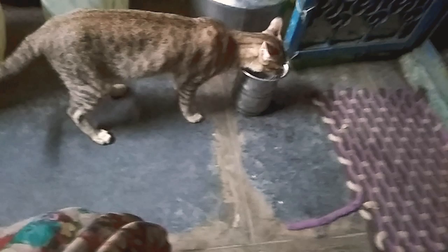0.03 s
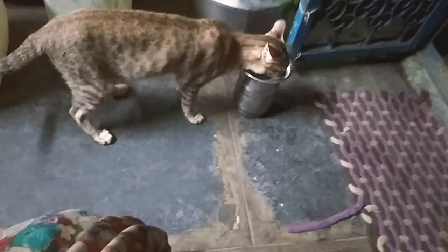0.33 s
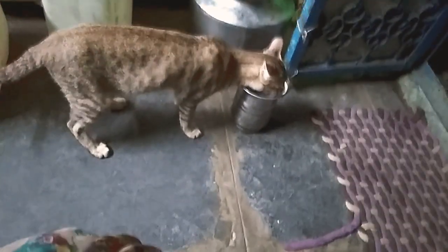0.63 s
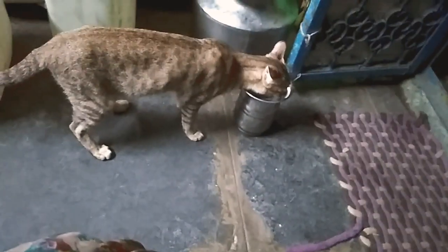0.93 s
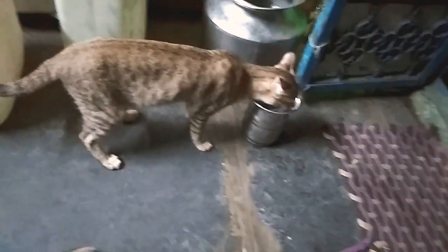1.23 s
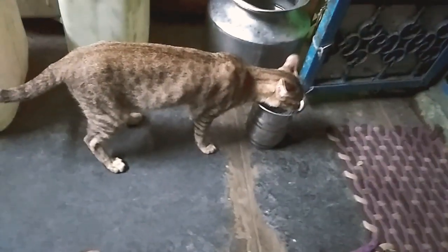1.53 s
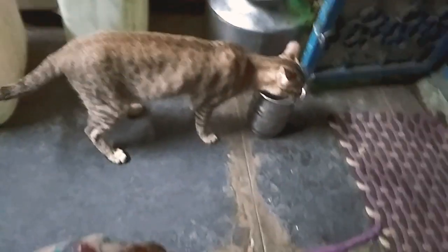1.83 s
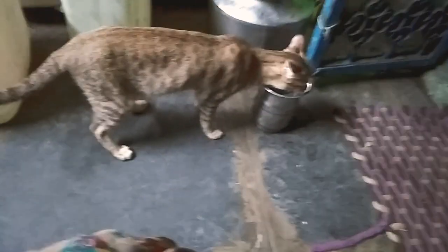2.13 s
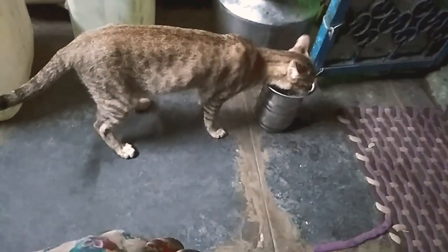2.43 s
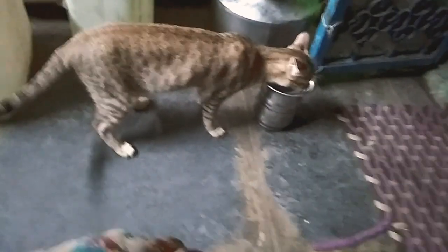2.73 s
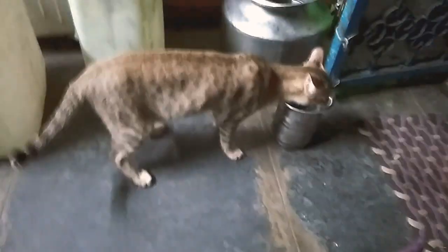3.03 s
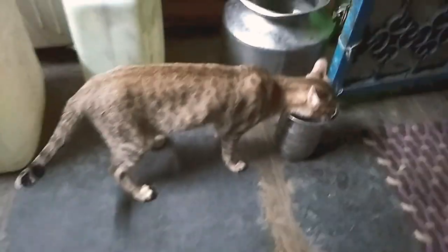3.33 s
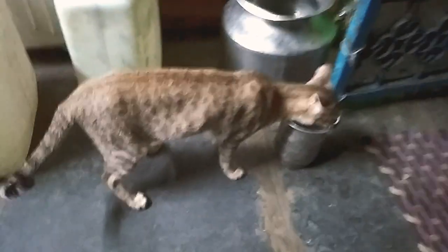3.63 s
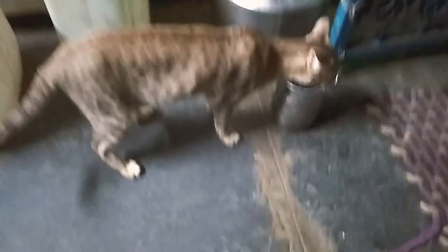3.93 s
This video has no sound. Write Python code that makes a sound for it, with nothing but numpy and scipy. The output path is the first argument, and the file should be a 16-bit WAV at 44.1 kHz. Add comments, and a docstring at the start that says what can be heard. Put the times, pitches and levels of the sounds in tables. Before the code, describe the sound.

A cat laps water from a metal cup in a small room, making bright wet ticks about four or five times a second, with softer smacks and slurps between. A short low boom sounds at 0.2 seconds as the lapping starts. The laps pause briefly after 0.9 and 2.4 seconds, then weaken toward 4 seconds. Low room rumble, a faint chirping cricket and a thin insect hiss continue throughout.

```python
"""Cat lapping water

A cat drinks from a metal cup in a small hard room, about 4.5 laps/s. Each tongue slap is a bright
wet tick with spray and a slurp; softer wet smacks fall between laps. Behind it are low room
rumble and night insects: one chirps, others blend into a hiss. A short low boom comes first."""
import sys
import numpy as np
from scipy import signal
from scipy.fft import rfft, irfft
from scipy.io import wavfile

SR = 44100
rng = np.random.default_rng(int(sys.argv[2]) if len(sys.argv) > 2 else 0)


def put_to_file(sound):
    """Save the sound as 16-bit audio at rate SR, in the file named by the first command-line argument."""
    columns = np.atleast_2d(sound).T  # one column per channel
    safe = np.clip(columns, -1, 1)
    whole_steps = np.round(safe * 32767)
    wavfile.write(sys.argv[1], SR, whole_steps.astype(np.int16))


N = 176400
TIME = np.arange(N) / SR
BUBBLE_DECAY_S, BUBBLE_WIDTH_OCT = 0.0028, 0.067

# tongue slaps: t/s, tick level/dB, centre f/Hz, decay/s, slurp level/dB
LAPS = [(0.272, -38.5, 9200, 0.0012, -58), (0.49, -29, 10400, .0016, -60), (0.705, -43, 10300, 0.0019, -67),
        (0.930, -49.5, 10500, 0.0028, -68), (1.489, -38.5, 7300, 0.002, -71),
        (1.707, -29.5, 10200, 0.0013, -59.5), (1.9278, -34.5, 7800, 0.0019, -65),
        (2.147, -46, 10100, 0.0024, -62), (2.372, -41.5, 9900, 0.001, -61),
        (2.905, -43.5, 9400, 0.0027, -70.5), (3.1242, -36.5, 8000, 0.0021, -68),
        (3.3447, -42.5, 8800, 0.0025, -68), (3.567, -50.5, 10200, 0.0039, -69),
        (3.79, -53.5, 10000, 0.0043, -74)]
# wet tick spectrum: f/Hz, level/dB
TICK_SPECTRUM = [(3200, -4), (4600, -17), (5500, -1), (6200, -7), (7000, 3.5), (9000, 3.5), (12500, 1.5),
                 (14000, -1.5), (15500, -18.5)]
# narrow bands of crackle and rustle: f/Hz, level/dB
NARROW_BANDS = [(1130, 1.5), (1690, 3.5), (2150, 0.5), (2700, 1.5), (4450, -14.5), (5000, -2), (5400, 0.5),
                (10600, 4.5)]


def from_db(db):
    """Decibels to gain."""
    return 10 ** (np.asarray(db) / 20)


def unit_rms(x):
    """Scale to rms 1."""
    return x / np.sqrt(np.mean(x ** 2) + 1e-20)


def in_time(points):
    """Interpolate a table at every sample."""
    return np.interp(TIME, *np.transpose(points))


def at_hz(points, hz):
    """Interpolate a table over log frequency."""
    points_hz, values = np.transpose(points)
    return np.interp(np.log(hz), np.log(points_hz), values)


def bin_hz(size):
    """FFT bin frequencies, floored at 1 Hz."""
    return np.maximum(np.arange(size // 2 + 1) * SR / size, 1)


def bell(hz, centre_hz, width_oct):
    """Gaussian peak in log frequency."""
    return np.exp(-.5 * (np.log2(hz / centre_hz) / width_oct) ** 2)


def pan(db):
    """Stereo gains for an L-R level difference."""
    return from_db(np.array([[.5], [-.5]]) * db)


def noise(gain, correlation):
    """Stereo noise of given spectrum and L/R correlation, rms 1."""
    mid, side = rfft(rng.standard_normal((2, N)))
    correlation = np.clip(correlation, -1, 1)
    spectrum = np.sqrt(1 + correlation) * mid + np.sqrt(1 - correlation) * side * [[1], [-1]]
    return unit_rms(irfft(gain * spectrum, N))


def drift(corner_hz):
    """Low-passed random modulation, rms 1."""
    return unit_rms(irfft(rfft(rng.standard_normal(N)) / (1 + (bin_hz(N) / corner_hz) ** 2), N))


def pluck(t, rise_s, decay_s):
    """Rounded attack, exponential decay."""
    return (1 - np.exp(-(t / rise_s) ** 2)) * np.exp(-t / decay_s)


def burst(gain, envelope, scatter_rad=0.71):
    """Enveloped noise grain; phase scatters between the channels."""
    phase = 2 * np.pi * rng.random(len(gain)) + scatter_rad * rng.standard_normal((2, len(gain)))
    grain = irfft(gain * np.exp(1j * phase), len(envelope)) * envelope
    return grain * np.sqrt(np.sum(envelope ** 2) / np.sum(grain ** 2, axis=1, keepdims=True))


def add(out, start_s, sound):
    """Mix a sound in at start_s."""
    i = max(int(start_s * SR), 0)
    out[:, i:i + sound.shape[-1]] += sound[:, :max(N - i, 0)]


def rumble(crossover_hz=180, drone_width_hz=4.3, dip_s=0.008):
    """Uneven low room noise with droning resonances and faint air; the level dips briefly."""
    # rumble and air spectra: f/Hz, level/dB
    rumble_spectrum = [(13, -60.5), (22, -1.5), (43, -10.5), (75, -1.5), (119, 2), (207, -7.5), (274, -3.5),
                       (356, -9), (426, -7), (610, -14.5), (673, -23), (755, -20), (819, -25.5),
                       (1100, -33.5), (1430, -47), (2420, -120)]
    air_spectrum = [(700, 5), (1100, 2.5), (1650, 6.5), (1900, 2), (2150, 7), (2800, -2.5), (3250, -14.5),
                    (4200, -9), (5100, -18), (6000, -11), (8000, -45)]
    # stereo coherence: f/Hz, L/R correlation before clipping
    correlation = [(30, 0.95), (120, 0.93), (300, 1.04), (600, 0.35), (1200, -0.5)]
    # balance: f/Hz, L-R/dB
    balance = [(30, 6.3), (120, 7.1), (280, 7.4), (450, 9.5), (750, 17.9), (1100, 16.1)]
    # gain below and above the crossover: t/s, level/dB
    bass_level = [(0.17, -18), (0.23, 5.5), (0.6, -0.5), (1.25, -2.5), (1.8, 0.5), (2.5, 0), (3.1, 0),
                  (3.5, 1.5), (3.85, 3.5), (4.0, 8.5)]
    middle_level = [(0.2, 2), (0.62, 0), (0.9, 3.5), (1.25, 0), (1.5, 2), (1.9, 0), (2.15, 2.5), (2.35, 0),
                    (2.8, 1), (3.1, -0.5), (3.6, 0.5), (4.0, -0.5)]
    # narrow resonances: f/Hz, level/dB, L-R/dB
    drones = [(31.9, -64, 9), (68.5, -57.5, 5.5), (388.8, -74.5, 13), (594.7, -79, 4.5), (766.8, -74.5, 14)]
    # level dips: t/s, depth/dB
    dips = [(1.128, 10), (1.387, 11), (2.289, 9.5), (3.012, 11.5), (3.112, 12)]
    hz = bin_hz(N)
    gain = from_db(at_hz(rumble_spectrum, hz)) / np.sqrt((1 + (hz / 1150) ** 12) * (1 + (18 / hz) ** 4))
    spectrum = rfft(noise(gain, at_hz(correlation, hz))) * pan(at_hz(balance, hz))
    bass_share = 1 / (1 + (hz / crossover_hz) ** 4)
    bass = irfft(spectrum * bass_share, N) * from_db(in_time(bass_level))
    middle = irfft(spectrum * (1 - bass_share), N) * from_db(in_time(middle_level) + 2.02 * drift(39))
    low = from_db(-50) * (bass + middle)
    for centre_hz, db, pan_db in drones:
        resonance = 1 / (1 + ((hz - centre_hz) / drone_width_hz) ** 2)
        low += from_db(db) * pan(pan_db) * noise(resonance, correlation=1.0)
    air = noise(from_db(at_hz(air_spectrum, hz)) / (1 + (hz / 9000) ** 8), correlation=0.066)
    air = air * pan(db=20) * from_db(-78.5 + 2.6 * drift(17.5))
    dip_db = sum(db * np.exp(-.5 * ((TIME - at_s) / dip_s) ** 2) for at_s, db in dips)
    return low * from_db(-dip_db) + air * from_db(-.5 * dip_db)


def far_insects():
    """Distant insects blend into a wavering hiss."""
    # chorus spectrum: f/Hz, level/dB
    spectrum = [(8200, -30), (8700, -1), (9100, 6), (9550, 3), (10000, -10), (11200, -18.5), (11900, -35),
                (15500, -40)]
    level = from_db(-69 + 2.5 * drift(9.4))
    return level * noise(from_db(at_hz(spectrum, bin_hz(N))), correlation=0.13) * pan(db=0.3)


def cricket(chirps_per_s=9.084, centre_hz=6947, stroke_s=0.0042, tail_s=0.033):
    """Two wing strokes per chirp, smeared by the room."""
    # wing strokes: t in cycle/s, level/dB
    strokes = [(0.021, -0.5), (0.039, 3.5)]
    cycle_s = TIME % (1 / chirps_per_s)
    pulses = sum(from_db(db) ** 2 * np.exp(-((cycle_s - at_s) / stroke_s) ** 2) for at_s, db in strokes)
    power = signal.lfilter([1], [1, -np.exp(-2 / (tail_s * SR))], pulses)
    envelope = from_db(-65 + 1.3 * drift(5)) * np.sqrt(power / power.max())
    return envelope * noise(bell(bin_hz(N), centre_hz, width_oct=0.05), correlation=0.15) * pan(db=-2)


def boom(start_s=0.203, tone_hz=98.9, rise_s=0.022, hold_until_s=0.096, decay_s=0.086):
    """A low, nearly pure tone swells, holds and dies away unevenly."""
    t = TIME - start_s
    envelope = np.clip(t / rise_s, 0, 1) * np.exp(-np.maximum(t - hold_until_s, 0) / decay_s)
    roughness = 1 + (1 - envelope) * drift(36)
    return pan(db=2.5) * from_db(-33) * envelope * roughness * np.sin(2 * np.pi * tone_hz * t)


def reverb(dry, early_t60_s=0.051, early_db=-6.5, room_t60_s=0.27, room_db=-0.5, size=32768):
    """Quick reflections from cup and floor, plus the room's diffuse tail."""
    t, response = TIME[:size], 0
    for t60_s, db in ((early_t60_s, early_db), (room_t60_s, room_db)):
        tail = rng.standard_normal((2, size)) * np.exp(-np.log(1000) * t / t60_s) * (t > .002)
        response = response + from_db(db) * unit_rms(tail) / np.sqrt(size)
    return signal.fftconvolve(dry, response, axes=1)[:, :N]


def rustle(flicker_db=8):
    """Stirred water rustles in the cup; each band within 4-6 kHz flickers on its own."""
    # rustle envelope: t/s, level/dB
    level = [(0.42, -95), (0.6, -78), (1.08, -81.5), (1.42, -87), (2.1, -93), (2.7, -90), (3.25, -110),
             (3.55, -104), (3.7, -108), (3.82, -75.5), (4.0, -100.5)]
    hz = bin_hz(N)
    water = sum(from_db(db + flicker_db * drift(35))
                * noise(bell(hz, band_hz, width_oct=0.05), correlation=0.039)
                for band_hz, db in NARROW_BANDS if 4000 < band_hz < 6000)
    return from_db(in_time(level)) * unit_rms(water)


def crackle(rate_per_s=55, level_db=-70, spread_db=2, count=400, size=1024):
    """Faint random narrow-band grains, a light crackle."""
    out, hz = np.zeros((2, N)), bin_hz(size)
    envelope = pluck(TIME[:size], rise_s=0.0014, decay_s=0.0045)
    times_s = np.cumsum(rng.exponential(1 / rate_per_s, count))
    bands = rng.integers(0, len(NARROW_BANDS), count)
    for at_s, band, strength in zip(times_s, bands, rng.standard_normal(count)):
        band_hz, db = NARROW_BANDS[band]
        grain = burst(bell(hz, band_hz, width_oct=0.076), envelope)
        add(out, at_s, from_db(level_db + db + spread_db * min(strength, 1)) * grain)
    return out


def knocks(gain_db=-4.5, decay_cycles=4.4, size=4096):
    """Dull mouth clicks and light knocks; low ones ring longer."""
    # clicks and knocks: t/s, level/dB, f/Hz, width/oct
    hits = [(0.241, -57, 2490, 0.71), (0.282, -54.5, 1530, 0.45), (0.893, -38.5, 502, 0.14),
            (1.357, -53.5, 2400, 0.2), (2.548, -59.5, 1720, 0.087), (3.1, -55.5, 1220, 0.079),
            (3.867, -52, 1480, 0.38)]
    out, t, hz = np.zeros((2, N)), TIME[:size], bin_hz(size)
    for at_s, db, centre_hz, width_oct in hits:
        envelope = pluck(t, 1 / centre_hz, decay_cycles / centre_hz)
        add(out, at_s, from_db(db + gain_db) * burst(bell(hz, centre_hz, width_oct), envelope))
    return out


def bubbles(gain_db=-4.5, offset_s=0.025, lead_in_s=0.0067, lead_in_db=-13.5, size=4096):
    """Short wet smacks, each with a faint swelling lead-in."""
    # smacks and bubbles: t/s, level/dB, f/Hz
    smacks = [(0.306, -57.5, 4470), (0.632, -58.5, 4500), (0.636, -45.5, 10200), (0.660, -57, 4840),
              (0.813, -57, 4480), (0.84, -45, 9500), (0.902, -50, 9350), (0.962, -64, 5350),
              (1.084, -57, 5130), (1.324, -56.5, 4780), (1.334, -57, 5670), (1.676, -42.5, 9060),
              (1.719, -55.5, 5000), (1.879, -51, 5010), (1.991, -59.5, 5370), (2.061, -49.5, 2080),
              (2.083, -60.5, 5400), (2.168, -50, 2190), (2.219, -48, 8460), (2.226, -52.5, 1660),
              (2.317, -46.5, 5010), (2.418, -50.5, 5530), (2.62, -60.5, 5300), (2.658, -60, 4940),
              (2.755, -59, 4970), (2.824, -49, 9240), (2.994, -61, 5600), (3.207, -53.5, 2640),
              (3.373, -60, 4270), (3.439, -55, 5600), (3.532, -62.5, 5000), (3.535, -48, 10600),
              (3.787, -57.5, 4900), (3.871, -52, 10300), (3.937, -58, 10000)]
    out, t, hz = np.zeros((2, N)), TIME[:size] - offset_s, bin_hz(size)
    envelope = pluck(np.maximum(t, 0), rise_s=0.0011, decay_s=BUBBLE_DECAY_S)
    for at_s, db, centre_hz in smacks:
        smack = burst(bell(hz, centre_hz, BUBBLE_WIDTH_OCT), envelope)
        lead_in = burst(bell(hz, centre_hz, width_oct=0.085), np.exp(-np.abs(t) / lead_in_s))
        add(out, at_s - offset_s, from_db(db + gain_db) * (smack + from_db(lead_in_db) * lead_in))
    return out


def slurp(rise_s=0.013, decay_s=0.053, flicker_db=5, spurt_db=3.5, bands=16):
    """The tongue draws up a thread of water, which fizzes in spurts as it falls back."""
    power, hz = 0, bin_hz(N)
    for at_s, *_, db in LAPS:
        t = TIME - at_s
        power = power + (from_db(db) * np.exp(np.minimum(t / rise_s, -t / decay_s))) ** 2
    fizz = sum(from_db(at_hz(TICK_SPECTRUM, band_hz) + flicker_db * drift(64))
               * noise(bell(hz, band_hz, width_oct=0.035), correlation=0.15)
               for band_hz in np.linspace(5000, 14500, bands))
    return np.sqrt(power) * unit_rms(fizz * from_db(spurt_db * drift(45)))


def laps(rise_s=0.00088, tick_db=-0.5, tick_width_oct=0.42, ring_hz=5540, ring_db=-66, size=2048):
    """Each tongue slap ticks, rings the cup and throws fine spray; some water splashes back."""
    # back-splashes: t/s, level/dB, centre f/Hz
    splashes = [(0.3535, -50, 7100), (0.5662, -43, 9800), (0.7404, -49, 9800), (1.3563, -64, 7200),
                (1.567, -56, 11000), (3.134, -40, 9700), (3.207, -46.5, 7960), (3.3544, -35, 8300)]
    drops, mean_delay_s = 5, 0.05
    spray_hz, scatter_oct, spray_db, spread_db = 10200, 0.069, -19.5, 2.5
    out, t, hz = np.zeros((2, N)), TIME[:size], bin_hz(size)
    colour = from_db(at_hz(TICK_SPECTRUM, hz))
    for at_s, db, centre_hz, decay_s, _ in LAPS:
        envelope = pluck(t, rise_s, decay_s)
        tick = burst(colour * bell(hz, centre_hz, tick_width_oct), envelope)
        ring = burst(bell(hz, ring_hz, BUBBLE_WIDTH_OCT), pluck(t, rise_s, BUBBLE_DECAY_S))
        add(out, at_s, from_db(db + tick_db) * tick + from_db(ring_db) * ring)
        delays_s = rng.exponential(mean_delay_s, drops)
        for delay_s, detune, strength in zip(delays_s, *rng.standard_normal((2, drops))):
            drop_hz = spray_hz * 2 ** (scatter_oct * detune)
            drop = burst(colour * bell(hz, drop_hz, width_oct=0.15), envelope)
            add(out, at_s + delay_s, from_db(db + spray_db + spread_db * min(strength, 1)) * drop)
    for at_s, db, centre_hz in splashes:
        splash = burst(colour * bell(hz, centre_hz, tick_width_oct), pluck(t, rise_s, decay_s=0.0009))
        add(out, at_s, from_db(db) * splash)
    return out


def scene():
    """The drinking cat in its room, over the background."""
    # cat's balance, lower range further left: f/Hz, L-R/dB
    balance = [(5700, 12), (6800, 2.5)]
    impacts = laps() + bubbles() + crackle() + knocks()
    cat = impacts + reverb(impacts) + slurp() + rustle()
    cat = irfft(rfft(cat) * pan(at_hz(balance, bin_hz(N))), N)
    return cat + cricket() + far_insects() + rumble() + boom()


def record(dry, stopband_hz=16000):
    """Fade-in and steep low-pass."""
    # fade-in gain: t/s, level/dB
    fade_in = [(0, -55), (.05, -64), (.07, -22.5), (.13, -11), (.19, -8.5), (.24, -3)]
    lowpass = signal.cheby2(14, 60, stopband_hz, fs=SR, output="sos")
    return signal.sosfilt(lowpass, dry * from_db(in_time(fade_in)))


dry = scene()
out = record(dry)
put_to_file(out)
```